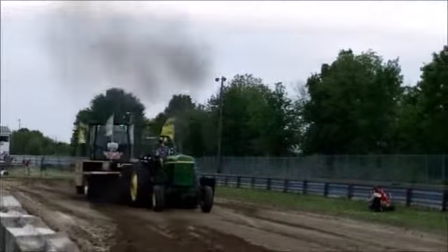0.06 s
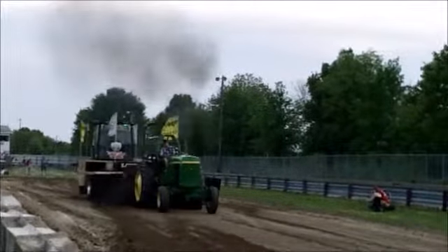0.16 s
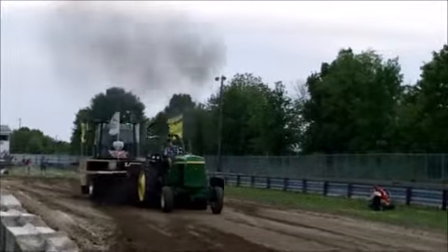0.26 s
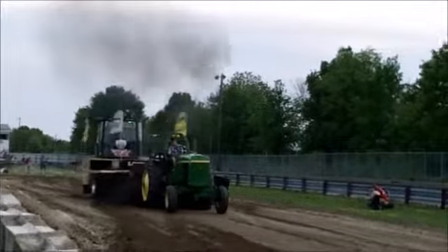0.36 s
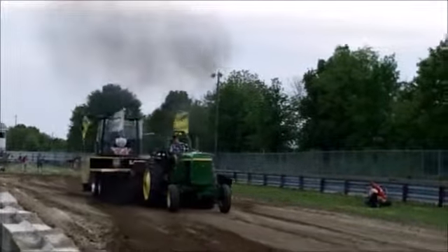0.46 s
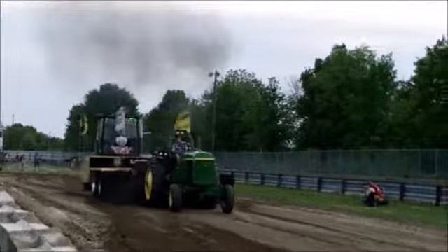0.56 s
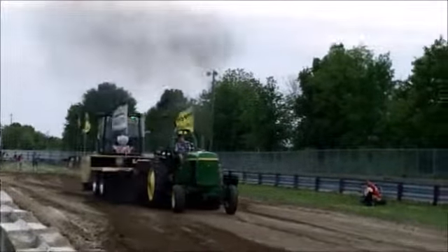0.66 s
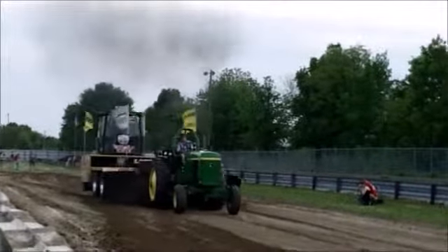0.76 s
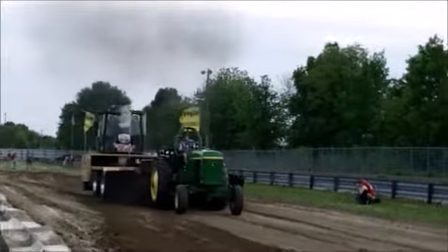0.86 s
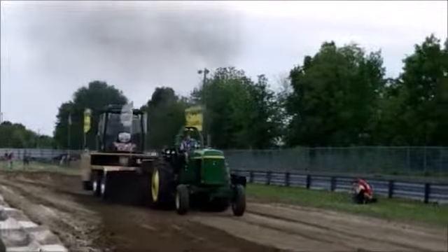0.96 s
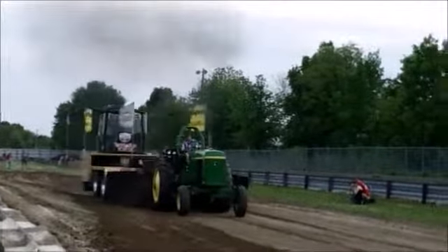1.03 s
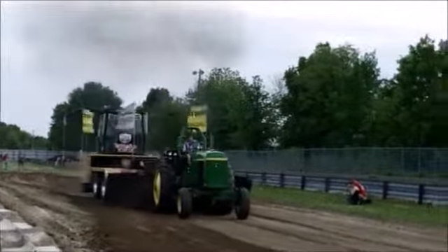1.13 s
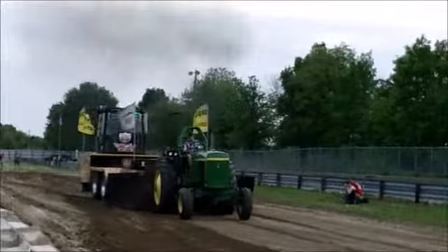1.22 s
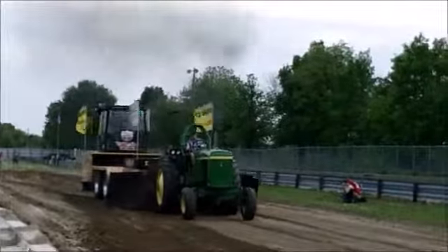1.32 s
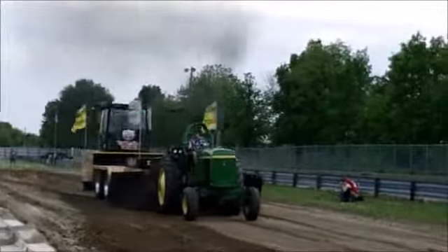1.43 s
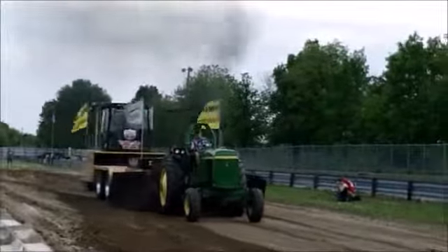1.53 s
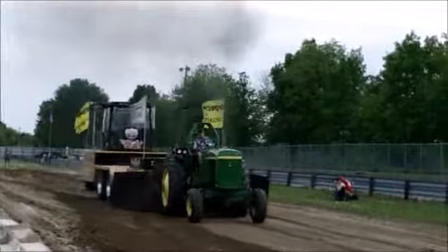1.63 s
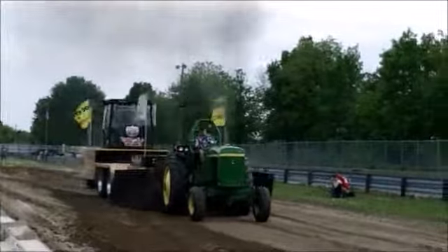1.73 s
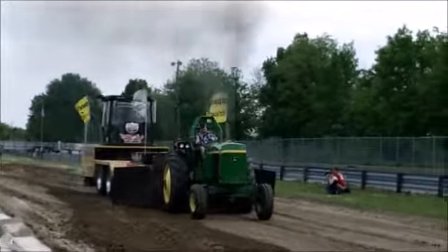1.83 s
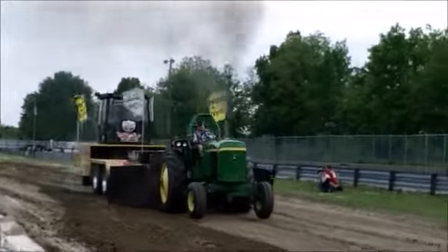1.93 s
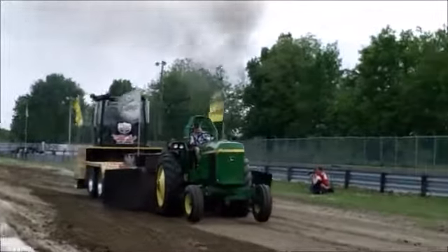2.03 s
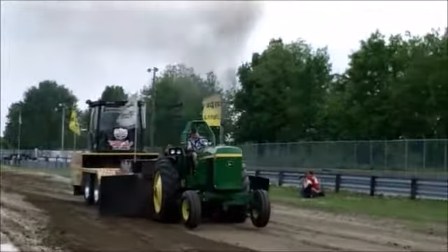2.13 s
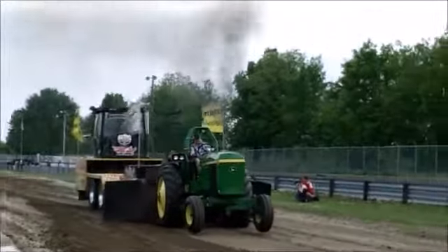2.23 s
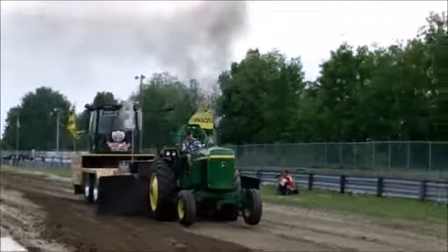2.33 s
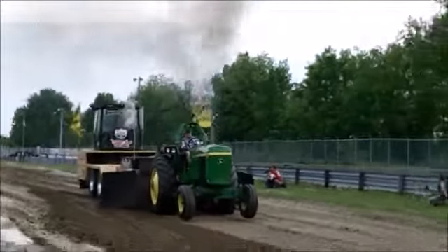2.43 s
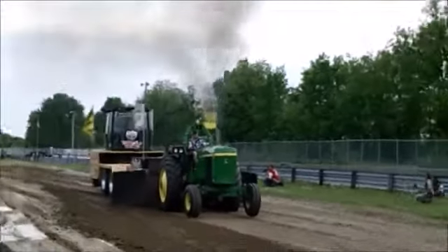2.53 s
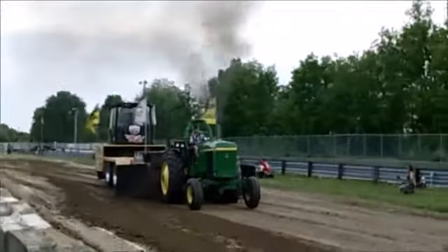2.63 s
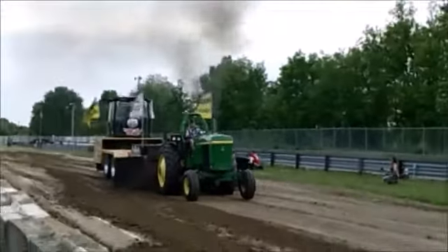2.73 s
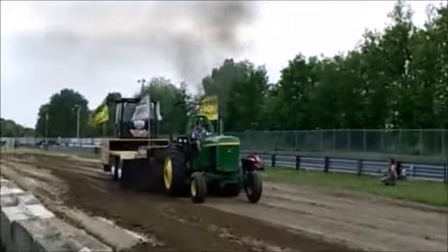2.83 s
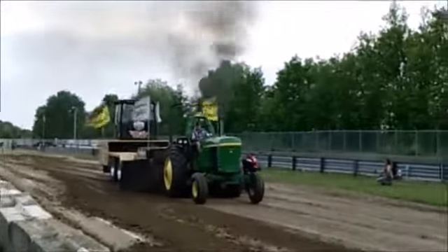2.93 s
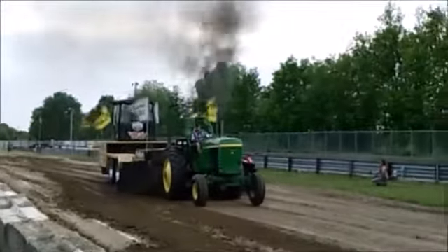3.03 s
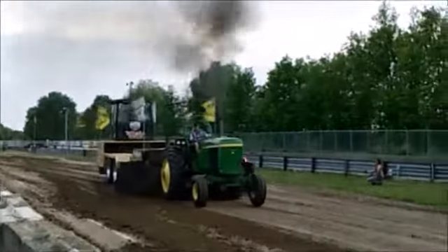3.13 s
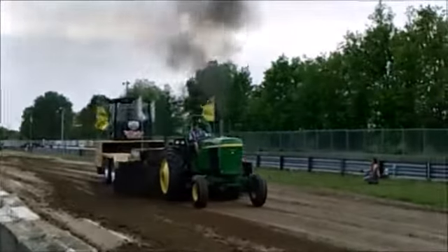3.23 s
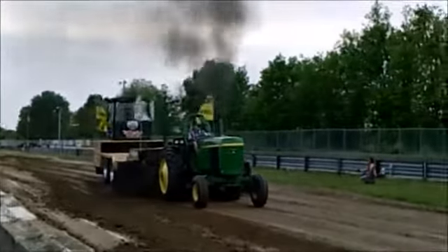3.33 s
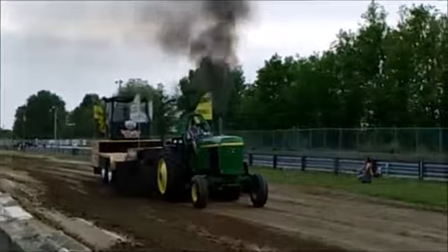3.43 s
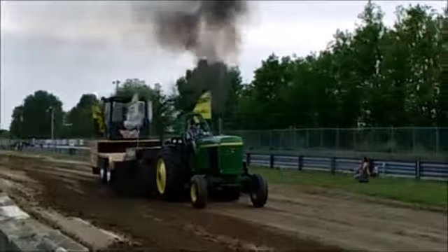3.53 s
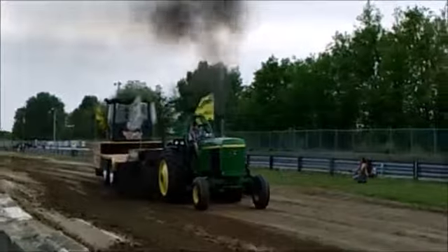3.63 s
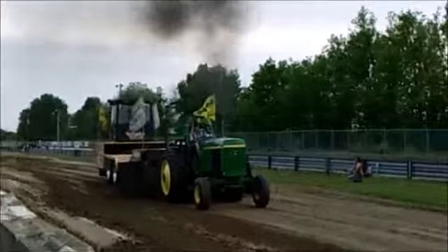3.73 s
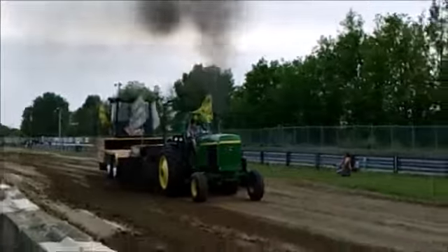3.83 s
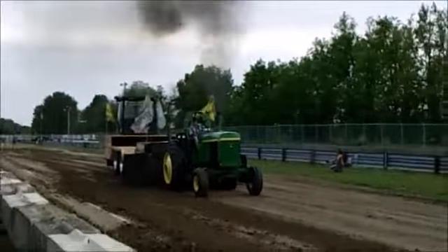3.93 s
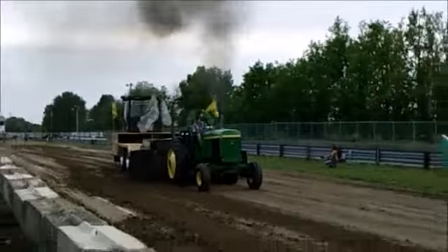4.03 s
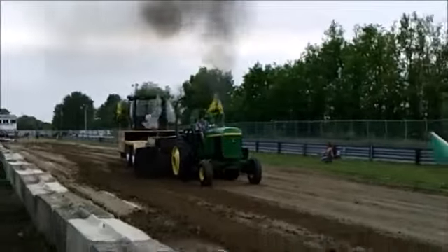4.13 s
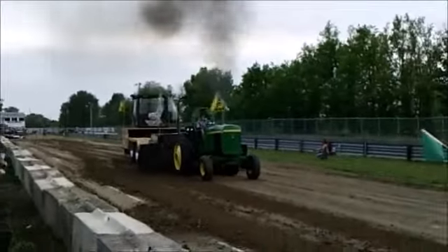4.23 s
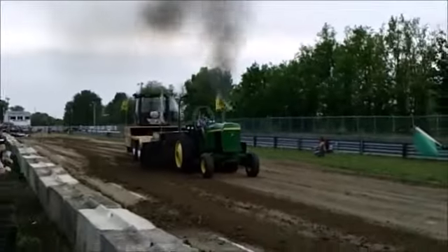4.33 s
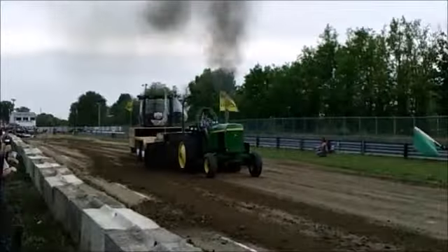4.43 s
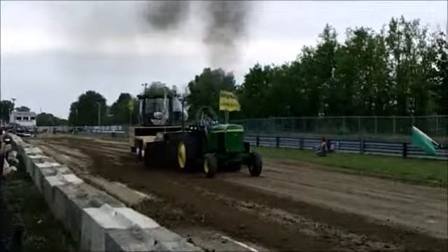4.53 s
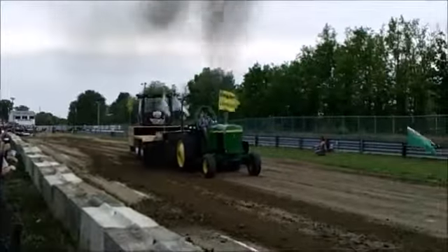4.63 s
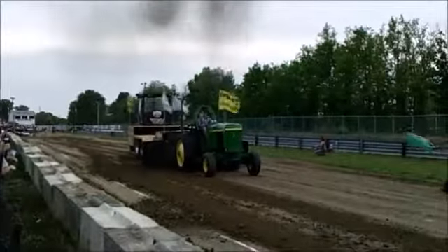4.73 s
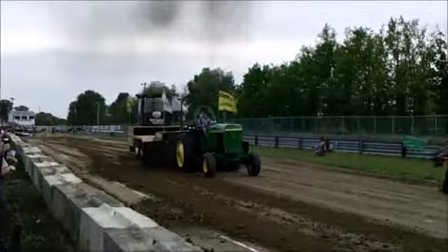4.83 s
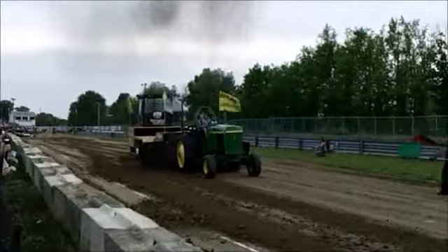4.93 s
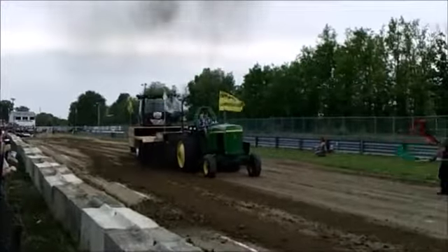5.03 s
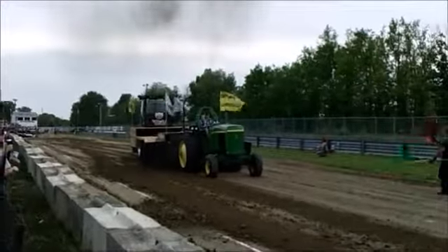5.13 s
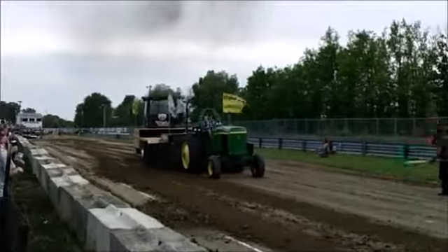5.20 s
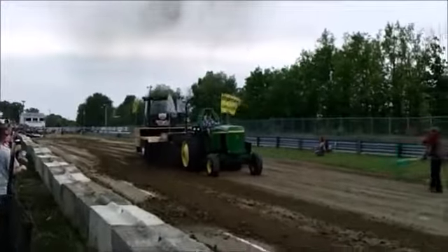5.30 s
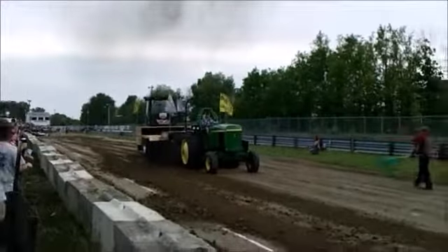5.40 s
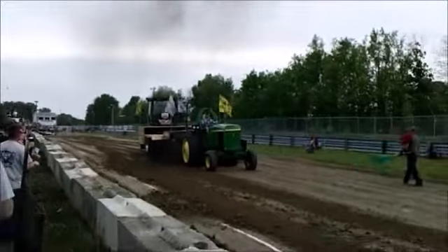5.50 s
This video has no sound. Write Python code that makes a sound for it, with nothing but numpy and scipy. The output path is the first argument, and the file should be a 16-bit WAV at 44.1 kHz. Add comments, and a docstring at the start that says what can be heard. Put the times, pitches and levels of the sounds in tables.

```python
"""A six-cylinder turbo diesel tractor roars flat out, dragging a sled nearer, its turbo whistling above 10 kHz.
At 4.7 s the throttle shuts: the engine runs down and the turbo coasts; 0.4 s later a little fuel is fed in again.
Each firing drives boom tones and puffs of filtered noise from the stack; shocks add sizzle and cracks.
The track mirrors the puffs under load, later as the stack nears. Tyres and sled rumble as low filtered noise."""
import sys
import numpy as np
from scipy import signal
from scipy.fft import rfft, irfft, next_fast_len
from scipy.io import wavfile
from scipy.ndimage import map_coordinates

SR = 44100
rng = np.random.default_rng(int(sys.argv[2]) if len(sys.argv) > 2 else 0)


def to_wav(sig):
    """Store sig (one row per channel, or 1-D mono) as 16-bit WAV at the path in sys.argv[1].

    Samples outside -1..1 are clipped; the rate is SR.
    """
    pcm = np.clip(np.atleast_2d(sig), -1, 1) * 32767
    pcm = np.round(pcm).astype(np.int16)
    wavfile.write(sys.argv[1], SR, pcm.T)  # frames by channels


N = 245181
TIME = np.arange(N) / SR
SHUT_S, SHUT_TAKES_S = 4.692, 0.022
REOPEN_S, REOPEN_TAKES_S = 5.127, 0.3


def amp(db):
    """Decibels to gain."""
    return 10 ** (np.asarray(db) / 20)


def unit(x):
    """Scales to rms 1."""
    return x / np.sqrt(np.mean(x ** 2) + 1e-20)


def curves(rows):
    """Each column of a timed table, interpolated at every sample."""
    s, *columns = np.transpose(rows)
    return [np.interp(TIME, s, c) for c in columns]


def ramp(start_s, takes_s):
    """Goes linearly from 0 to 1, beginning at start_s."""
    return np.clip((TIME - start_s) / takes_s, 0, 1)


def wander(rate_hz):
    """Smooth random curve of rms 1, with rate_hz random knots a second."""
    knots = rng.standard_normal(4096)
    return unit(map_coordinates(knots, [TIME * rate_hz], order=3, mode="wrap"))


def colour(x, points):
    """Filters x by gains drawn on a log-frequency axis, then scales to rms 1."""
    hz, db = np.transpose(points)
    size = next_fast_len(N)
    f_hz = np.fft.rfftfreq(size, 1 / SR)
    gain = amp(np.interp(np.log(f_hz + 1), np.log(hz), db))
    return unit(irfft(rfft(x, size) * gain, size)[:N])


# distance of the stack: t/s, distance/m
STACK_DISTANCE = [(0, 30.5), (.9, 28.1), (1.5, 24.6), (1.9, 24), (2.5, 21.4), (3, 18.62), (3.3, 18.7),
                  (3.8, 18)]
NEAR_M = 17.33  # 0 dB distance


def nearness_db():
    """Gain from the approach, by the inverse distance law."""
    metres, = curves(STACK_DISTANCE)
    return 20 * np.log10(NEAR_M / metres)


# surges of the gas flow during the pull: t/s, level/dB
FLOW_SURGE = [(0.0, -0.05), (0.86, -0.5), (1.04, 0.3), (1.14, -1.1), (1.42, 0.6), (1.84, -2), (1.94, 0.3),
              (1.98, -1.85), (2.76, -0.4), (2.9, -3), (3.16, 1.5), (3.36, -1.0), (3.46, 1.5), (3.64, 1.2),
              (3.8, -2.2), (3.94, 1), (4.08, -1.5), (4.38, -1.0), (4.42, 1), (4.66, -0.4)]


def flow_db(level_db, surge, approach):
    """Gas-driven level: follows the surges and the approach, each by its own factor."""
    surge_db, = curves(FLOW_SURGE)
    return level_db + surge * surge_db + approach * nearness_db()


def throttle_db(shut_db, ebb_db_per_s, reopen_db):
    """Steps as the throttle shuts, drifts while coasting, then rises, quickly at first, as it reopens."""
    coasted_s = np.clip(TIME, SHUT_S, REOPEN_S) - SHUT_S
    reopened = np.sqrt(ramp(REOPEN_S, REOPEN_TAKES_S))
    return shut_db * ramp(SHUT_S, SHUT_TAKES_S) + ebb_db_per_s * coasted_s + reopen_db * reopened


# firing tone during the pull: t/s, level/dB
FIRING_LEVEL = [(0.0, -19.5), (0.62, -21), (1.0, -16.8), (1.1, -20.6), (1.34, -21), (1.42, -19),
                (1.94, -19.9), (1.98, -22.3), (2.74, -20.2), (2.88, -25.4), (3.2, -24.5), (3.24, -20.5),
                (3.42, -19.7), (3.52, -23), (3.62, -19.0), (3.76, -21), (4.34, -23), (4.52, -20.5),
                (4.66, -22.9)]
# octave of the firing tone, swelling and fading: t/s, level/dB
OCTAVE_LEVEL = [(0.0, -35), (0.2, -29), (0.54, -43), (0.7, -29.5), (1.04, -30.5), (1.18, -38), (1.32, -30),
                (1.54, -43), (1.74, -32), (2.16, -33.5), (2.3, -41.5), (2.74, -35), (3.58, -42.5),
                (3.68, -33.5), (4.14, -35.5), (4.36, -44), (4.52, -32), (4.66, -40)]
# harmonics droning off load: multiple of firing rate, coasting level/dB, gain on reopening/dB
OFF_LOAD_DRONES = [(4, -51, 11), (8, -59, 12)]
# lines from unequal cylinders: multiple of engine-cycle rate, level under load at NEAR_M/dB, approach/(dB/dB)
ENGINE_CYCLE_LINES = [(3, -50, -1), (4, -46.5, 2), (5, -52, -1), (7, -50, 0), (8, -50, 1), (9, -44.5, 1),
                      (14, -51.5, -1.5), (16, -47, -.6), (18, -46.5, 1.5), (20, -43, -0.56), (24, -48, 3),
                      (26, -42.5, 5.5)]
CYCLE_OFF_LOAD_DB = -18.5  # the cylinders even out once the load is off
KICK_S, KICK_WIDTH_S, KICK_DB = 4.8, 0.039, 4  # brief swell of the firing tone


def boom(firings, load, steady_db=0.65, unsteady_db=1.4, cycle_waver_db=2.15):
    """Stack tones locked to firing phase: rate, harmonics, engine-cycle lines; the first two waver more off load."""
    kick = np.exp(-((TIME - KICK_S) / KICK_WIDTH_S) ** 2)
    firing_db = curves(FIRING_LEVEL)[0] + KICK_DB * kick
    firing_db += throttle_db(shut_db=-6.0, ebb_db_per_s=-19.5, reopen_db=2.0)
    octave_db = curves(OCTAVE_LEVEL)[0] + throttle_db(shut_db=0, ebb_db_per_s=-35, reopen_db=9.5)
    waver_db = steady_db + unsteady_db * (1 - load)
    angle = 2 * np.pi * firings
    tone = amp(firing_db + waver_db * wander(rate_hz=20)) * np.cos(angle)
    tone += amp(octave_db + waver_db * wander(rate_hz=15)) * np.cos(2 * angle)
    for multiple, db, reopen_db in OFF_LOAD_DRONES:
        drone_db = db + reopen_db * ramp(REOPEN_S, REOPEN_TAKES_S) + 2.5 * wander(rate_hz=17)
        tone += (1 - load) * amp(drone_db) * np.cos(multiple * angle)
    for multiple, db, approach in ENGINE_CYCLE_LINES:
        cycle_angle = angle * multiple / len(CYLINDER_STRENGTH) + rng.uniform(0, 2 * np.pi)
        line_db = flow_db(db, surge=0.99, approach=approach) + CYCLE_OFF_LOAD_DB * (1 - load)
        tone += amp(line_db + cycle_waver_db * wander(rate_hz=6)) * np.cos(cycle_angle)
    return np.sqrt(2) * tone  # levels are rms


def puffs(firings, cylinder_db, lag, rise, scatter_db, steady, repeat):
    """Turbulence released each firing, lag firing periods late; share repeat recurs every engine cycle."""
    place = firings - lag + 1
    index = np.floor(place).astype(int)
    scatter = np.clip(rng.standard_normal(1024), -2, 2)
    strength = amp(cylinder_db[index % len(cylinder_db)] + scatter_db * scatter[index])
    age = place % 1 / rise
    valve = age * np.exp(1 - age)  # snaps open, then the cylinder empties
    shape = rng.standard_normal(1780)
    cycle_phase = firings / len(cylinder_db) % 1
    locked = map_coordinates(shape, [cycle_phase * len(shape)], order=3, mode="wrap")
    turbulence = np.sqrt(repeat) * locked + np.sqrt(1 - repeat) * rng.standard_normal(N)
    return (steady + strength * valve) * turbulence


GROUND_LAG_MS = 1.195  # at NEAR_M; falls with distance


def over_ground(x, share, soft_turn_rad=1.0, dull_hz=7500):
    """Direct sound plus its track reflection; soft dirt turns the phase back and scatters the treble."""
    lag_s = GROUND_LAG_MS / 1000 * amp(nearness_db())
    size = next_fast_len(N)
    f_hz = np.fft.rfftfreq(size, 1 / SR)
    dirt = np.exp(-1j * soft_turn_rad) / (1 + (f_hz / dull_hz) ** 2)
    mirrored = irfft(rfft(x, size) * dirt, size)[:N]
    return unit(x + share * map_coordinates(mirrored, [(TIME - lag_s) * SR], order=3))


# cylinders in firing order: treble strength/dB, roar strength/dB
CYLINDER_STRENGTH = [(6.5, 1), (5.5, -0.5), (4, 6), (4, -0.5), (3, 7), (4, 2)]
# filter of the low stack roar: f/Hz, gain/dB
ROAR_FILTER = [(130, -8), (230, -9), (300, -1), (420, 2), (600, 3.5), (800, -8.5), (1200, -12.5),
               (2000, -15), (5000, -62)]
# filter of the broad gas-jet rasp: f/Hz, gain/dB
RASP_FILTER = [(450, -33), (750, 1.5), (950, 2.5), (1300, -1), (1800, 2), (2400, 2), (3100, 3), (3800, 2.5),
               (5000, 3), (6000, -9), (7000, -8), (8200, -20.5), (10000, -23.5), (12500, -42), (16000, -47)]
# filter of the ringing shriek of each blast: f/Hz, gain/dB
SHRIEK_FILTER = [(2500, -19), (3600, -7), (4100, -4), (4500, 1), (4750, 0.5), (4970, 1), (5300, -4.5),
                 (5800, -9), (7000, -20.5), (9000, -29), (12000, -52)]
SCATTER_DB = 2.24  # firing-to-firing treble spread


def exhaust(firings, load):
    """Valve-gated turbulence in three bands, roar, rasp and shriek; all smooth out off load."""
    treble_db, low_db = np.transpose(CYLINDER_STRENGTH)
    coasting = 0.38 * (1 - load)
    roar = puffs(firings, low_db, lag=-0.15, rise=0.1, scatter_db=1.1,
                 steady=0.48 + coasting, repeat=0.55)
    rasp = puffs(firings, treble_db, lag=0.075, rise=0.1, scatter_db=SCATTER_DB,
                 steady=2.9 + coasting, repeat=0.31)
    shriek = puffs(firings, treble_db, lag=0.032, rise=0.24, scatter_db=SCATTER_DB,
                   steady=0.32 + coasting, repeat=0.074)
    roar = over_ground(colour(roar, ROAR_FILTER), share=0.3 * load)
    rasp = over_ground(colour(rasp, RASP_FILTER), share=0.46 * load)
    shriek = over_ground(colour(shriek, SHRIEK_FILTER), share=0.5 * load)
    roar_db = flow_db(level_db=-30.5, surge=1.4, approach=0.7)
    roar_db += throttle_db(shut_db=-12.5, ebb_db_per_s=-27, reopen_db=13.5)
    rasp_db = flow_db(level_db=-24.5, surge=1.0, approach=0.21)
    rasp_db += throttle_db(shut_db=-8, ebb_db_per_s=-23, reopen_db=8.5)
    shriek_db = flow_db(level_db=-23.0, surge=1.48, approach=0.65)
    shriek_db += throttle_db(shut_db=-10.5, ebb_db_per_s=-26, reopen_db=11.5)
    return amp(roar_db) * roar + amp(rasp_db) * rasp + amp(shriek_db) * shriek


# filter of the shock sizzle: f/Hz, gain/dB
SIZZLE_FILTER = [(3000, -9), (5800, 3), (7200, -5), (8500, -13), (10000, -16.5), (12500, -27), (16000, -27)]
# separate sharp cracks, before the high-pass: t/s, level/dB
EXHAUST_CRACKS = [(3.455, -15), (3.52, -41), (3.603, -13), (3.631, -26), (3.68, -10), (3.93, -24.5),
                  (4.62, -27), (4.65, -26)]


def crackle(firings, shocks_per_s=5000, spread_db=2):
    """Blasts steepen into tiny shocks: fine sizzle that carries only from close by, and separate cracks."""
    level_db = flow_db(level_db=-32.5, surge=0.69, approach=2.9)
    level_db += throttle_db(shut_db=-7, ebb_db_per_s=-22, reopen_db=0)
    chance = shocks_per_s / SR * (1 + 0.25 * np.sin(2 * np.pi * firings))
    strength = amp(spread_db * np.minimum(rng.exponential(1, N), 3))
    shocks = (rng.random(N) < chance) * rng.standard_normal(N) * strength
    sizzle = amp(level_db + 3.6 * wander(rate_hz=45)) * colour(shocks, SIZZLE_FILTER)
    cracks = np.zeros(N)
    for s, db in EXHAUST_CRACKS:
        cracks[round(s * SR)] = amp(db)
    highpass = signal.butter(2, 4000, "highpass", fs=SR, output="sos")
    return sizzle + signal.sosfilt(highpass, cracks)


def whistle(hz, flutter=0.0063, blur_hz=260):
    """Compressor blade tone, blurred into a narrow band by the turbulent gas."""
    angle = 2 * np.pi * np.cumsum(hz * (1 + flutter * wander(rate_hz=660))) / SR
    return wander(blur_hz) * np.cos(angle) + wander(blur_hz) * np.sin(angle)


# turbo whistle during the pull: t/s, f/Hz, level before trim/dB
TURBO_PULL = [(0, 10730, -51), (.5, 10700, -53), (.68, 10600, -47), (1.3, 10200, -48), (1.68, 10500, -48),
              (1.87, 10500, -47), (2.25, 11000, -55), (2.82, 11400, -55), (3.02, 11320, -57),
              (3.26, 12000, -57), (3.42, 11640, -51), (3.68, 12400, -57), (3.87, 11520, -52),
              (4, 11730, -55), (4.28, 11350, -46), (4.45, 11380, -59), (4.69, 11780, -53)]
COAST_S, COAST_TIME_S, COAST_POWER = 4.69, .52, .86  # speed falls as (1 + t / time) ** -power
# second, higher tone of the coasting turbo
WHINE_RATIO, WHINE_DB, WHINE_FROM_S, WHINE_RISE_S = 1.64, -60.5, 5.26, .04


def turbo(trim_db=-5):
    """Gas drives the blades; once cut off, air drag slows them, fast at first, and the tone carries better."""
    driven_hz, driven_db = curves(TURBO_PULL)
    coasted_s = np.maximum(TIME - COAST_S, 0)
    hz = driven_hz * (1 + coasted_s / COAST_TIME_S) ** -COAST_POWER
    coasting_db = throttle_db(shut_db=3.5, ebb_db_per_s=6, reopen_db=12)
    blades_db = trim_db + driven_db + coasting_db + 2 * wander(rate_hz=16)
    blades = amp(blades_db) * whistle(hz)
    whine = amp(WHINE_DB) * ramp(WHINE_FROM_S, WHINE_RISE_S) * whistle(WHINE_RATIO * hz)
    return blades + whine


# filter of the tyre and sled rumble: f/Hz, gain/dB
RUMBLE_FILTER = [(15, -28), (30, 0), (50, 0), (75, 2.5), (120, 4.5), (200, 2.5), (350, -6), (1000, -81),
                 (4000, -63)]
# churn of tyres and sled: t/s, level/dB
CHURN_LEVEL = [(0, -38.5), (.7, -41.5), (1.4, -35.5), (2.2, -47), (3.2, -40), (4.2, -43), (5.1, -49.5),
               (5.35, -41), (5.56, -42)]


def churn():
    """Low rumble of tyres and sled pan in the dirt, as filtered noise."""
    level_db, = curves(CHURN_LEVEL)
    return amp(level_db + 2 * wander(rate_hz=9.6)) * colour(rng.standard_normal(N), RUMBLE_FILTER)


# engine speed: t/s, firing rate/Hz
ENGINE_SPEED = [(0.0, 148.9), (1.2, 150.2), (2.7, 146.6), (2.86, 148.8), (3.06, 144), (3.28, 147),
                (3.52, 143), (3.66, 147.1), (4.3, 145.5), (4.52, 143.0), (4.6, 142), (4.68, 151.5),
                (4.8, 151), (4.92, 141), (5.13, 134), (5.22, 131), (5.56, 114)]


def scene():
    """One firing phase and one throttle drive the engine; turbo and churn are added."""
    firing_hz, = curves(ENGINE_SPEED)
    load = 1 - ramp(SHUT_S, SHUT_TAKES_S)
    firings = np.cumsum(firing_hz) / SR
    engine = boom(firings, load) + exhaust(firings, load) + crackle(firings)
    return (engine + turbo() + churn())[None]


EDGE_HZ = 15800


def record(dry):
    """Band limit: linear-phase low-pass at EDGE_HZ."""
    lowpass = signal.firwin(511, EDGE_HZ, window=("kaiser", 9), fs=SR)
    return signal.oaconvolve(dry, lowpass[None], "same")


dry = scene()
out = record(dry)
to_wav(out)
```